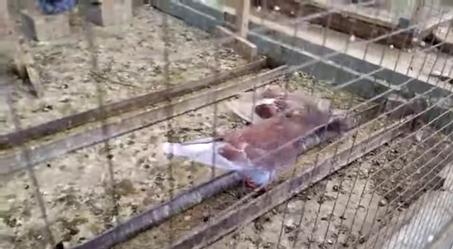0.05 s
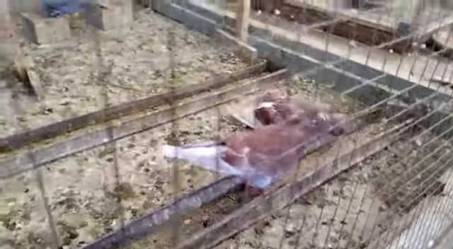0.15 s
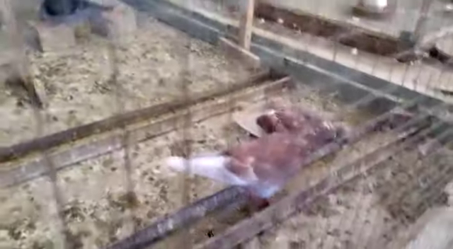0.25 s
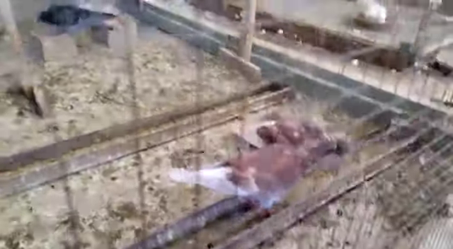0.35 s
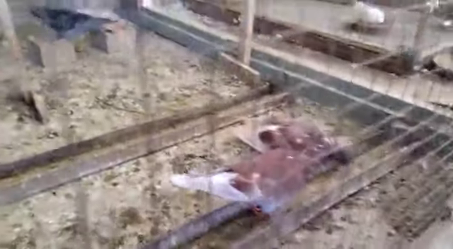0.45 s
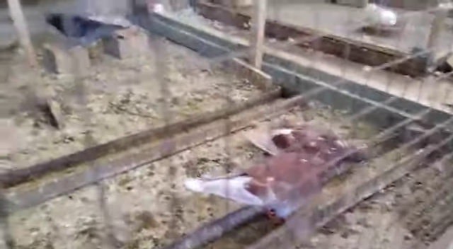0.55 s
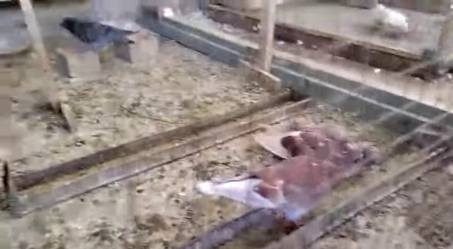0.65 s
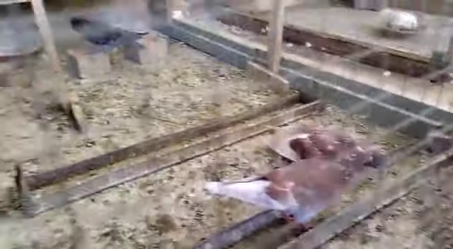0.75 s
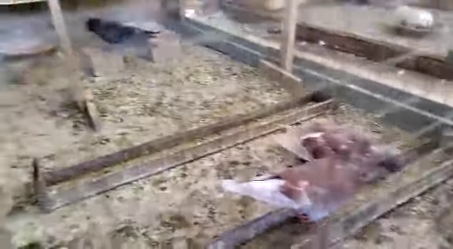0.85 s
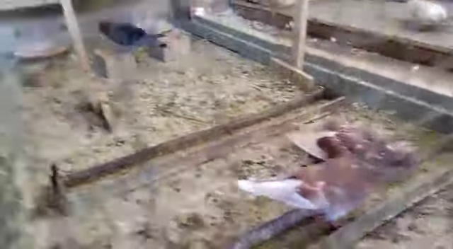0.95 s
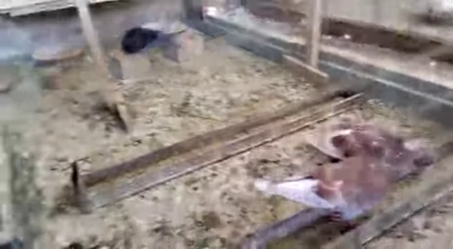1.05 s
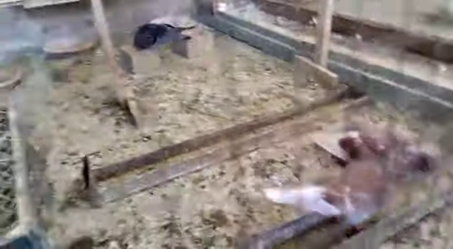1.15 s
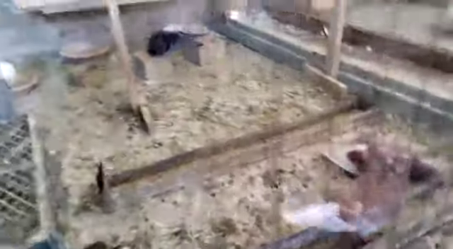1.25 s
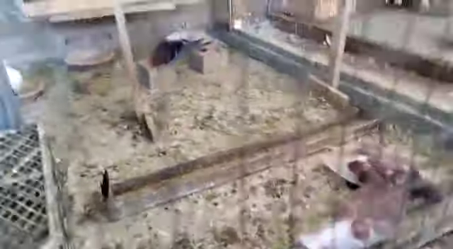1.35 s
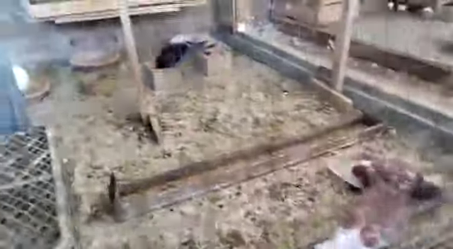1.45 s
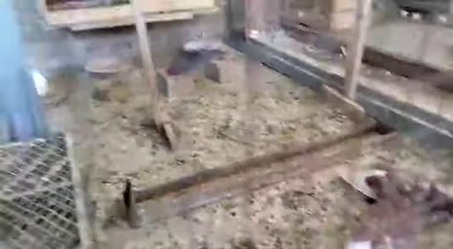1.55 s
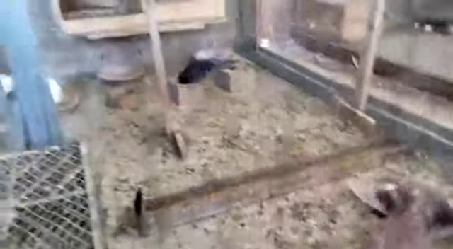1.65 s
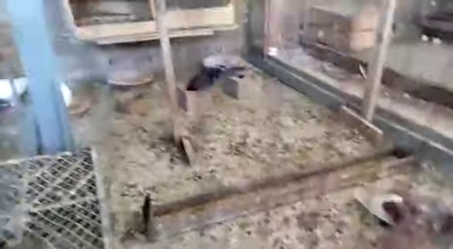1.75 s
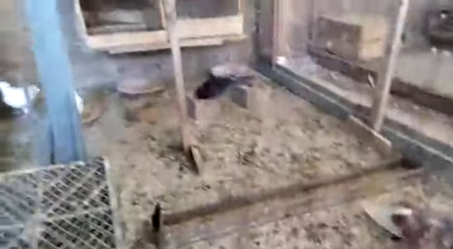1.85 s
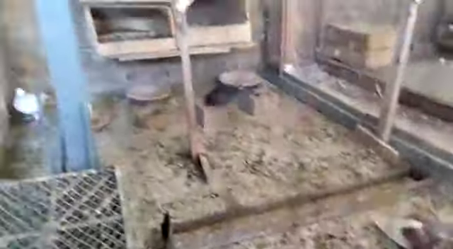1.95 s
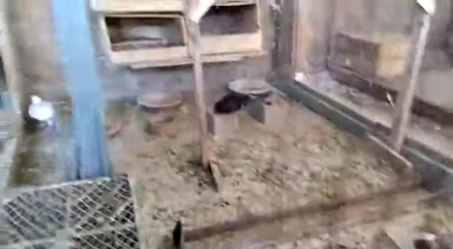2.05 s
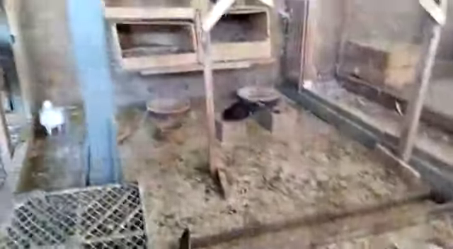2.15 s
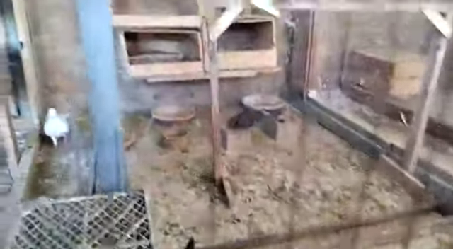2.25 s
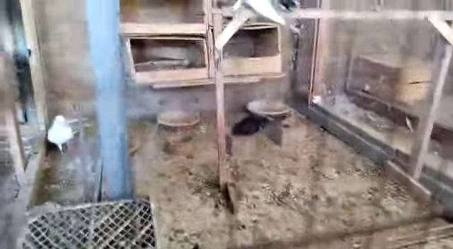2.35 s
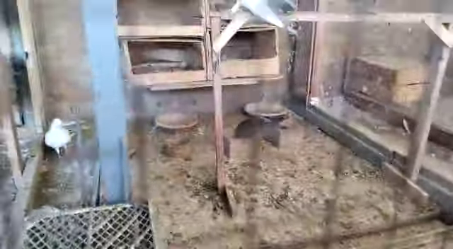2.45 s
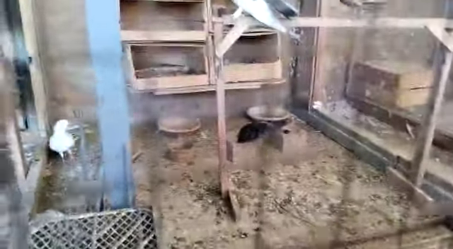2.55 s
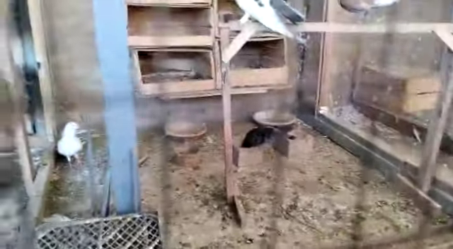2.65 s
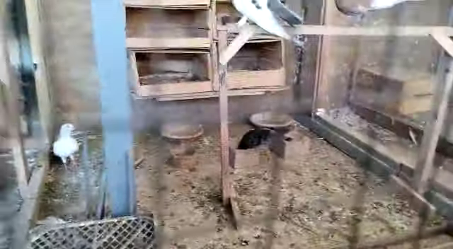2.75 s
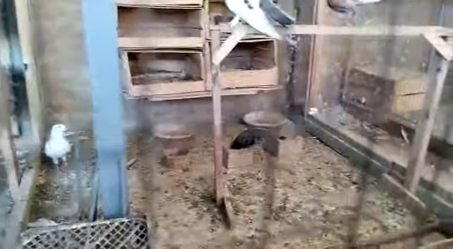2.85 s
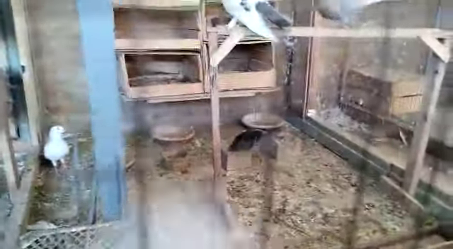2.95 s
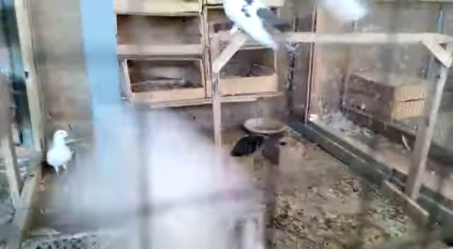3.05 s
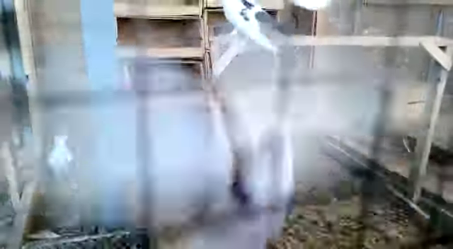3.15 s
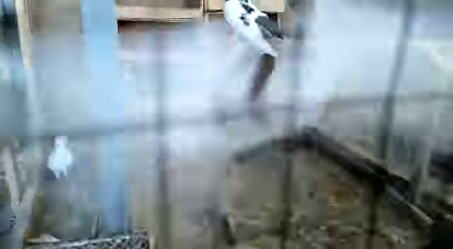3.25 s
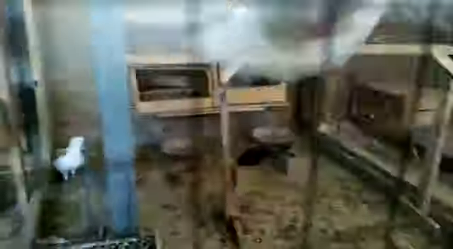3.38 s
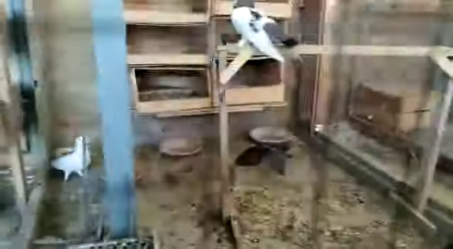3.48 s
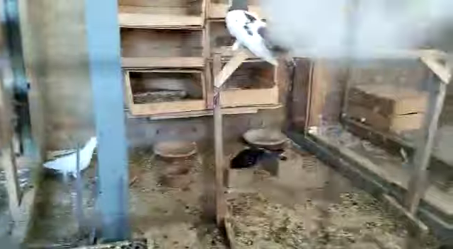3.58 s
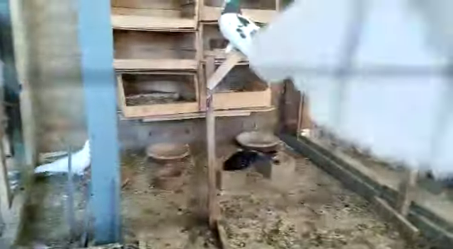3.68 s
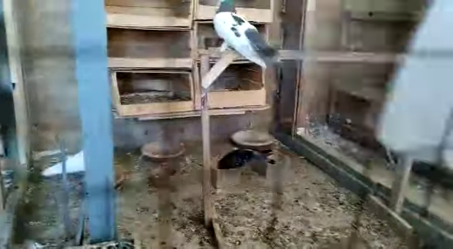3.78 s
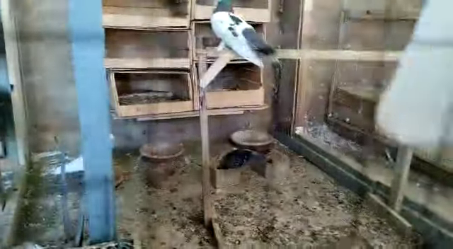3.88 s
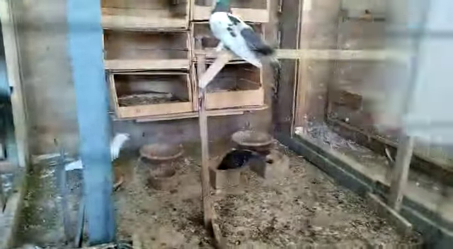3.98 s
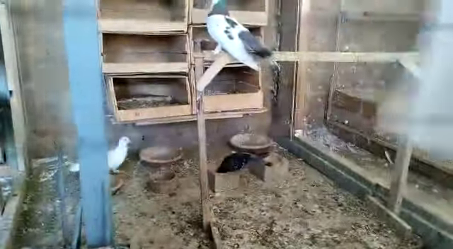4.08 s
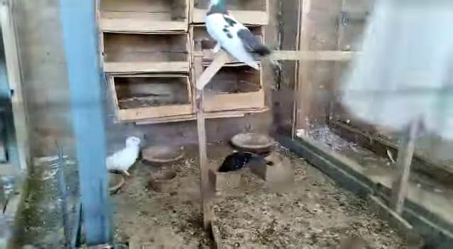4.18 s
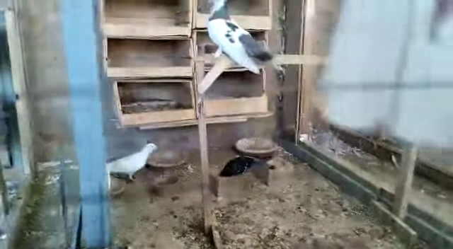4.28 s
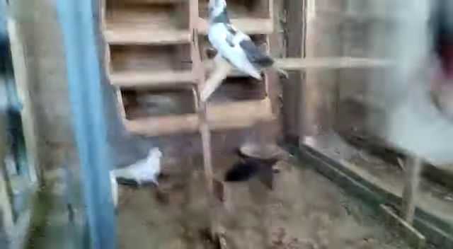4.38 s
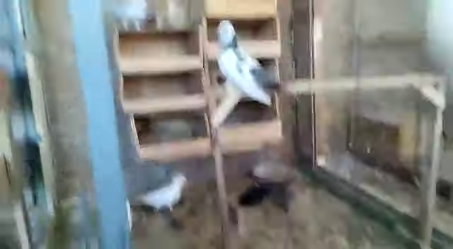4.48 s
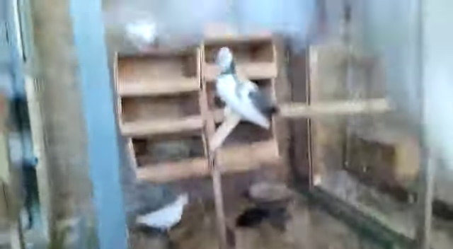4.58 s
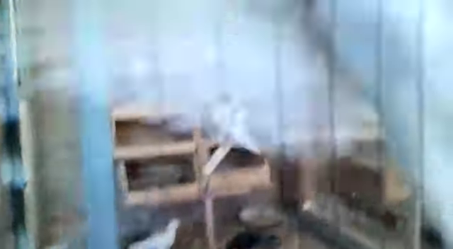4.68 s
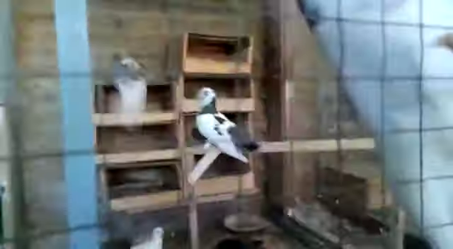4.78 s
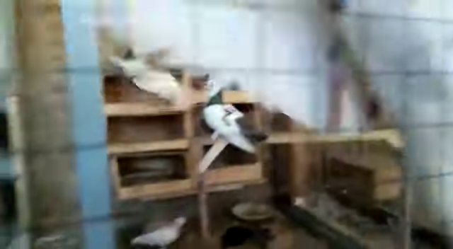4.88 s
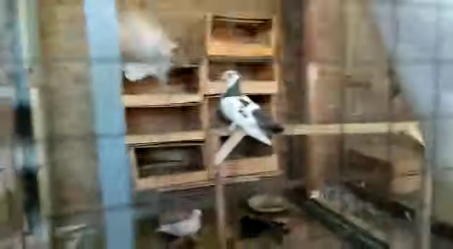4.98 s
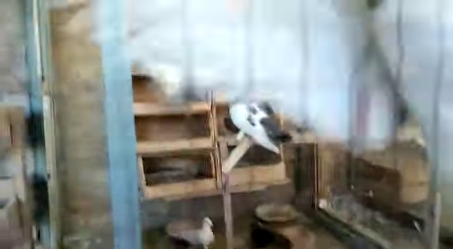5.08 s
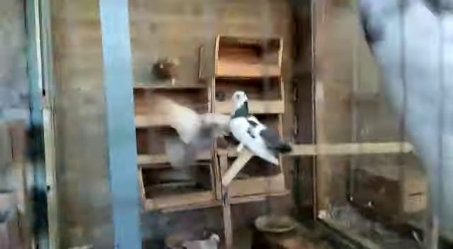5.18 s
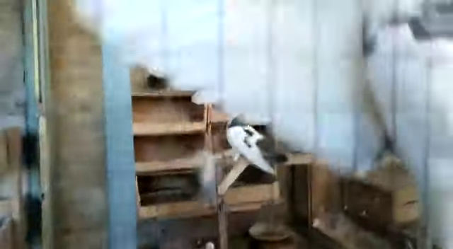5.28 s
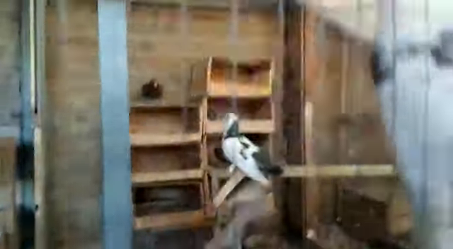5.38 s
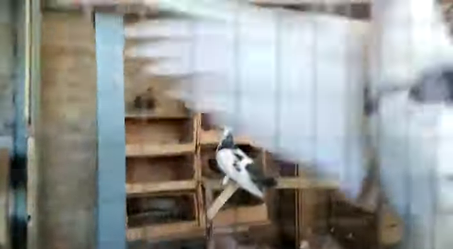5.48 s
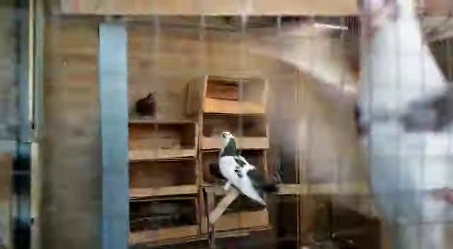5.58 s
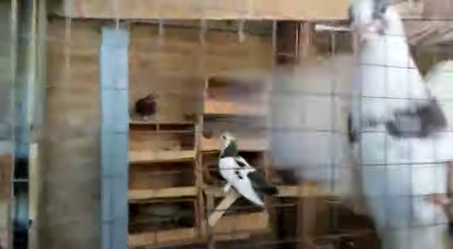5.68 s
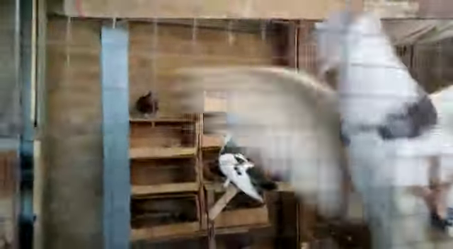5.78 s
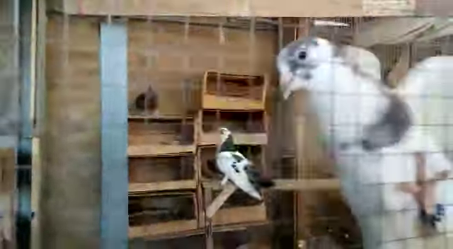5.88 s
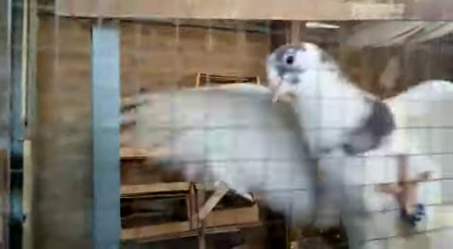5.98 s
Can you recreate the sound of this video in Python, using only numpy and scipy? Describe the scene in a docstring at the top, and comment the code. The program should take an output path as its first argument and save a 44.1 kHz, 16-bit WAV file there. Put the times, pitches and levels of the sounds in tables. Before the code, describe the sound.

In a small wooden pigeon loft, claws tick and beaks knock lightly over faint low rumble and hum, with thin whistles barely heard. Halfway through, a pigeon flaps up right at the microphone with loud, crisp slaps, swishing air and low puffs. It clings there, shuffling its feathers with scratchy rustles, gives small hoarse grunts, and ends with two hard wing claps and a short boxy echo.

```python
"""A pigeon flies up to a wire right in front of the microphone in a small wooden loft: its wings slap as volleys
of tiny clicks, swish as filtered noise and push puffs of air at the microphone, which first bumps softly as it is
handled. It clings there shuffling its feathers, grunts hoarsely, then claps its wings twice; the boards give a
short, bright echo of dense noise. Around it feet and beaks tick and knock as short noise bursts and board rings.
Gliding tones make thin faint whistles and blurred, breathy swishes over a low wavering hum and outdoor rumble."""
import sys
import numpy as np
from scipy import signal
from scipy.fft import rfft, irfft
from scipy.io import wavfile
from scipy.ndimage import uniform_filter1d

SR = 44100
rng = np.random.default_rng(int(sys.argv[2]) if len(sys.argv) > 2 else 0)


def waveform_to_disk(signal):
    """Save audio, clipped to [-1, 1], as 16-bit WAV at the path in sys.argv[1]."""
    frames = np.transpose(np.atleast_2d(signal))
    scaled = np.clip(frames, -1, 1) * 32767
    samples = np.round(scaled).astype(np.int16)
    wavfile.write(sys.argv[1], SR, samples)


N = 265923
TIME = np.arange(N) / SR

# relative noise spectrum of feathers and of stirred litter: f/Hz, level/dB
FEATHER_COLOUR = [(150, -25), (600, -14), (1200, -13), (2300, -10.5), (3400, -9), (4400, -12.5),
                  (5500, -3.5), (7500, 0.5), (9800, -4.5), (12000, -14), (16000, -24)]


def slaps(release_s=0.00047, release_share=1.0, snap_db=-10, thud_db=-25, thud_hz=320, scatter_db=-1.5):
    """The quills hit in a quick volley for as long as the contact lasts; returns direct sound and room send."""
    # wing slaps: t/s, level/dB, contact/s, treble tilt/dB per octave, room send/dB
    slap_hits = [(1.7233, -29, 0.008, 4.5, -14), (1.743, -38, 0.01, -2.5, -11),
                 (3.149, -14, 0.0028, 3, -15), (3.2594, -11.5, 0.0049, -1.5, -10),
                 (3.3169, -10.5, 0.0005, 4.5, -9), (3.376, -14, 0.0032, -1, -11.5),
                 (3.429, -16.5, 0.0028, 4.5, -15), (3.492, -21.5, 0.0029, -1, -4.5),
                 (3.5381, -12, 0.001, 3, -22), (3.547, -18.5, .0022, 2, -25),
                 (3.6697, -20, 0.0068, 3.5, -19), (3.6798, -9, 0.00055, 9, -13),
                 (5.5222, -10, 0.0052, -0.06, -7), (5.645, -7, 0.0034, 0.46, -8)]
    # relative noise spectrum of a slap: f/Hz, level/dB
    slap_colour = [(100, -7), (400, -18.5), (1000, -11), (1600, -9.5), (2600, -4.5), (3500, -5.5),
                   (4400, -8), (5500, 0), (7800, 3.5), (10000, -1.5), (12000, -10), (16000, -17)]
    direct, send = np.zeros(N), np.zeros(N)
    t = TIME[:SR // 10]
    scatter = np.exp(-t / 0.014)
    for s, db, contact_s, tilt_db, room_db in slap_hits:
        decay_s = release_s + release_share * contact_s
        envelope = np.exp(-np.maximum(t - contact_s, 0) / decay_s)
        volley = colour(envelope * crackle(len(t), spread_db=4.0), slap_colour, tilt_db)
        # air squeezed from under the wing
        squeezed_air = unit(band(rng.standard_normal(len(t)), thud_hz, 410))
        thud = amp(thud_db) * envelope * squeezed_air
        # stiff tips snap right up to the top, harder in bright slaps
        snap = amp(snap_db + 2.5 * tilt_db) * envelope * crackle(len(t), spread_db=15)
        add(direct, s, amp(db) * (ringing(volley) + thud + band(snap, 10400, 5300)))
        # each direction gets a different volley, and the nearest boards scatter them all
        spray = ringing(colour(scatter * rng.standard_normal(len(t)), slap_colour, tilt_db))
        match_energy = np.linalg.norm(envelope) / np.linalg.norm(scatter)
        spray = amp(db + room_db) * spray * match_energy
        add(direct, s, amp(scatter_db) * spray)
        add(send, s, spray)
    return direct, send


def ringing(x):
    """A slap together with the wire and board resonances that it sets off."""
    # what the wire and boards ring with under every slap: f/Hz, width/Hz, level/dB
    slap_rings = [(1565, 170, -2), (2210, 560, -6), (3720, 810, -3.5)]
    return x + sum(amp(db) * band(x, hz, width_hz) for hz, width_hz, db in slap_rings)


def flutter(attack_s=0.025, release_s=0.047):
    """Feathers slide over each other and air swishes through them; returns that and the draught on the microphone."""
    # bouts of wing work (take-off, full flight, landing, settling, clinging, two flurries):
    # t/s, length/s, feather hiss level/dB, swish level/dB, draught level/dB
    bouts = [(3.123, 0.11, -35.5, -39.5, -34), (3.237, .28, -31, -37.5, -29),
             (3.527, 0.16, -35.5, -44.5, -34.5), (3.776, 0.048, -29.5, -42, -37),
             (3.892, 1.15, -45, -52.5, -40.5), (5.09, 0.44, -45, -53.5, -47),
             (5.31, 0.15, -40.5, -41, -39.5), (5.524, 0.21, -49, -43, -45)]
    # relative noise spectrum of air through the feathers: f/Hz, level/dB
    swish_colour = [(100, 9.5), (300, 0.5), (500, 3.5), (750, 4), (1100, -3), (2000, -5), (3500, -5),
                    (6000, -24.5)]
    power = np.zeros((3, N))
    for s, length_s, *levels_db in bouts:
        attack = np.clip((TIME - s) / attack_s, 0, 1)
        release = np.exp(-np.maximum(TIME - s - length_s, 0) / release_s)
        power += np.outer(amp(levels_db), attack * release) ** 2
    sliding, airflow, draught = np.sqrt(power)
    unrest = walk(60)
    barbs = crackle(N, spread_db=2.5) * sliding * amp(3.0 * unrest)
    hiss = colour(barbs, FEATHER_COLOUR, tilt_db=-1.0)
    swish = colour(crackle(N, spread_db=5) * airflow * amp(2.9 * unrest), swish_colour)
    eddy_colour = [(12, 6), (35, -15.5), (70, -9.5), (130, -13.5), (300, -35.5), (1000, -120)]
    eddies = unit(colour(rng.standard_normal(N), eddy_colour))
    return hiss + swish, eddies * draught


def puffs(eddy_db=-19, eddy_hz=110):
    """A passing wing pushes air, sucks, and sheds eddies that buffet the microphone; a handling bump has the same shape."""
    # puffs of air from the wing strokes, and first a soft low bump as the microphone is handled:
    # t/s, level/dB, half width/s
    air_puffs = [(.025, -32.5, 0.0067), (3.232, -26.5, 0.018), (3.268, -22.5, .0062),
                 (3.337, -22.5, 0.0076), (3.38, -22, 0.0054), (3.45, -17.5, 0.013), (3.496, -18, 0.0049),
                 (3.544, -14, .011), (3.609, -30, 0.0089), (3.67, -19, .014), (3.828, -29.5, 0.015),
                 (4.157, -32, 0.01), (5.461, -29.5, 0.0055)]
    out = np.zeros(N)
    eddies = unit(band(band(rng.standard_normal(N), eddy_hz, 130), eddy_hz, 290))
    for s, db, width_s in air_puffs:
        u = (TIME - s) / width_s
        pressure = (2 * u ** 2 - 1) * np.exp(-u ** 2)
        buffeting = amp(eddy_db) * eddies * np.exp(-u ** 2 / 4)
        out += amp(db) * (pressure + buffeting)
    return out


def brushes(push_db=-25, push_hz=230, rasp_db=-13.5, rasp_db_per_tilt=2):
    """Feather barbs catch and slip in a jerky stroke that swells and dies away; the shafts rasp on the wire."""
    # feathers brushing wire and wood: t/s, level/dB, length/s, treble tilt/dB per octave
    strokes = [(.0, -44.5, 0.045, -6.5), (0.386, -49.5, 0.084, -2.5), (.818, -45.5, 0.052, -3),
               (1.547, -47.5, .05, 2), (2.087, -50, .06, 6), (2.493, -47, 0.061, -1),
               (2.736, -50.5, 0.069, -1), (3.109, -27.5, 0.086, 1.5), (3.645, -25, 0.024, 12),
               (3.77, -25.5, .022, 3.5), (4.013, -31.5, 0.016, 4), (4.086, -35.5, 0.021, -1),
               (4.141, -32.5, 0.059, 3.5), (4.199, -34, .03, -1.5), (4.25, -30, 0.022, -2),
               (4.389, -25.5, 0.019, 1), (4.435, -28.5, 0.11, 1.5), (4.451, -18.5, 0.0087, 2.5),
               (4.522, -28, 0.077, 0.5), (4.667, -26, 0.028, 1.5), (4.753, -30.5, 0.026, -2),
               (4.804, -28.5, .018, .5), (4.825, -28, 0.016, -2), (4.918, -25.5, 0.034, 1),
               (4.946, -15.5, 0.034, 0), (4.982, -21.5, 0.023, 3), (5.172, -28, 0.022, -1.5),
               (5.398, -32, 0.035, -4.5), (5.86, -39.5, 0.024, 3)]
    out, t = np.zeros(N), TIME[:SR // 4]
    for s, db, length_s, tilt_db in strokes:
        rise_s = 0.22 * length_s  # part of a stroke spent swelling
        envelope = np.minimum(t / rise_s, 1) * np.exp(-np.maximum(t - rise_s, 0) / (length_s - rise_s))
        barbs = crackle(len(t), spread_db=4) * amp(1.5 * walk(250)[:len(t)])
        stroke = colour(envelope * barbs, FEATHER_COLOUR, tilt_db)
        # the duller the stroke, the more the shafts rasp
        rasp = amp(rasp_db - rasp_db_per_tilt * tilt_db) * band(stroke, 3070, 1600)
        moved_air = unit(band(band(rng.standard_normal(len(t)), push_hz, 150), push_hz, 300))
        push = amp(push_db) * envelope * moved_air  # air under the wing
        add(out, s, amp(db) * (stroke + rasp + push))
    return out


def grunts():
    """Hoarse little notes of the straining pigeon: gliding tones with a weak octave and an unsteady pitch."""
    # short, soft grunts: t/s, length/s, start f/Hz, end f/Hz, level/dB
    grunt_notes = [(3.165, 0.048, 705, 835, -34), (5.203, 0.05, 734, 585, -41),
                   (5.321, 0.027, 787, 810, -37.5), (5.388, 0.041, 824, 700, -46)]
    out = np.zeros(N)
    for s, length_s, start_hz, end_hz, db in grunt_notes:
        add(out, s, amp(db) * note(length_s, start_hz, end_hz, flutter_hz=60, overtone=0.33))
    return out


def feet(scratch_s=0.0028, steps_per_s=18, step_db=-65, step_range_db=11, stir_db=-4):
    """Claws tick, beaks and feet knock; the rest of the flock patters and stirs the litter."""
    # claw ticks on wire and perches: t/s, level/dB ahead of the claw and board gains
    ticks = [(0.0315, -31.5), (0.4077, -27), (0.815, -31), (1.064, -38.5), (1.3114, -37.5), (1.6768, -35.5),
             (1.8574, -31.5), (1.933, -32.5), (2.2169, -34.5), (2.358, -36.5), (2.4966, -29), (2.579, -31),
             (2.7359, -30), (2.8907, -30.5), (3.009, -33)]
    # relative noise spectrum of a claw: f/Hz, level/dB
    claw_colour = [(300, -34), (1500, -16.5), (3200, 1), (4400, -8), (6000, 4.5), (8500, 4.5), (12000, -6),
                   (16000, -10)]
    # single pecks and, at the low pitches, footsteps on the boards: t/s, peak level/dB, pitch of the spot f/Hz
    knocks = [(.412, -41, 2000), (.832, -40, 1420), (1.062, -49, 1410), (1.567, -43.5, 730),
              (1.966, -50, 641), (2.191, -43, 1100), (2.314, -45, 684), (3.042, -45, 630)]
    # the flock shuffling in the litter: t/s, level/dB ahead of stir_db
    shuffle = [(0.0, -50), (0.23, -58.5), (0.73, -59), (0.85, -62.5), (1.33, -61), (1.76, -53.5),
               (1.86, -65.5), (2.07, -57.5), (2.63, -57.5), (2.81, -64), (3.0, -59), (3.08, -51)]
    claw_db, under_db = -5, -8  # the claw's own click and the boards under it
    out, t = np.zeros(N), TIME[:SR // 25]
    for s, db in ticks:
        tap = amp(db) * crackle(len(t), spread_db=-3.0) * np.exp(-t / scratch_s)
        click = amp(claw_db) * colour(tap, claw_colour)
        under = amp(under_db) * boards(tap, 2 ** rng.uniform(-0.1, 0.15))
        add(out, s, click + under)
    for s, db, hz in knocks:
        add(out, s, amp(db) * board_knock(hz))
    # one bird feeds in a quick, uneven run of pecks
    feed_start_s, feed_gap_s, feed_db, feed_hz, feed_count = 0.14, 0.056, -46.5, 1470, 12
    for k, (late, force, spot) in enumerate(rng.uniform(-0.89, 1, (feed_count, 3))):
        s = feed_start_s + (k + 0.3 * late) * feed_gap_s
        add(out, s, amp(feed_db + 5.8 * force) * board_knock(feed_hz * 1.6 ** spot))
    # steps of the flock, at random times
    for when, size, spot in rng.random((int(steps_per_s * N / SR), 3)):
        step = amp(step_db + step_range_db * size) * board_knock(600 * 4 ** spot)
        add(out, when * N / SR, step)
    litter_db = np.interp(TIME, *np.transpose(shuffle)) + stir_db + 2.9 * walk(34.9)
    litter = colour(crackle(N, spread_db=14.5) * amp(litter_db), FEATHER_COLOUR, tilt_db=0.8)
    return out + litter


def board_knock(hz, cycles=6, width_hz=520):
    """A beak or foot knocks the boards; each spot has its own dull pitch, and the low ones ring longer; peak 1."""
    t = TIME[:SR // 20]
    tap = rng.standard_normal(len(t)) * np.exp(-t * hz / cycles)
    knock = band(tap, hz, width_hz) + amp(-11) * boards(tap, 1.0)
    dull = signal.butter(3, [350, 2600], "band", fs=SR, output="sos")
    knock = signal.sosfilt(dull, knock)
    return knock / np.abs(knock).max()


def boards(x, pitch):
    """The dull ring of the floor, three resonances shifted together by the pitch factor of the spot."""
    # floor board resonances: f/Hz at pitch 1, width/Hz, level/dB
    board_rings = [(694, 330, 4.5), (1390, 170, -9), (2180, 800, -3.5)]
    return sum(amp(db) * band(x, hz * pitch, width_hz) for hz, width_hz, db in board_rings)


def whistles():
    """Faint gliding tones, some fluttering so widely that they blur into soft noise."""
    # thin faint whistles, and soft, blurred, breathy swishes:
    # t/s, length/s, start f/Hz, end f/Hz, level/dB, pitch flutter/Hz
    faint_notes = [(.64, .28, 5370, 5500, -61, 450), (1.09, .25, 4510, 3900, -58.5, 750),
                   (2.385, 0.12, 5740, 4970, -55, 604), (2.6, 0.067, 3180, 3130, -55, 70),
                   (2.842, 0.029, 3530, 3490, -57, 60), (2.91, 0.035, 6480, 5840, -47.5, 280),
                   (3.055, 0.072, 3260, 3240, -54, 70)]
    out = np.zeros(N)
    for s, length_s, start_hz, end_hz, db, flutter_hz in faint_notes:
        add(out, s, amp(db) * note(length_s, start_hz, end_hz, flutter_hz))
    return out


def note(length_s, start_hz, end_hz, flutter_hz, overtone=0):
    """A gliding note that swells and fades, with an unsteady pitch."""
    n = int(length_s * SR)
    pitch_hz = np.linspace(start_hz, end_hz, n) + flutter_hz * walk(700)[:n]
    phase = 2 * np.pi * np.cumsum(pitch_hz) / SR
    return np.hanning(n) * (np.sin(phase) + overtone * np.sin(2 * phase))


def loft(x):
    """The birds keep moving, so each moment meets its own pattern of echoes, crossfaded in 0.1 s hops."""
    out, hop = np.zeros(N), SR // 10
    x = np.pad(x, (0, 2 * hop))
    fade = np.sin(np.pi * np.arange(2 * hop) / (2 * hop))
    for i in range(0, N, hop):
        add(out, i / SR, signal.fftconvolve(x[i:i + 2 * hop] * fade, echoes()))
    return out


def echoes(split_hz=10000, t60_s=0.25, treble_t60_s=0.12):
    """Dense reflections from close boards for one place of the bird; the top dies first."""
    t = TIME[:SR // 3]
    noise = crackle(len(t), spread_db=3) * (1 - np.exp(-t / 0.004))
    low = signal.sosfilt(signal.butter(4, split_hz, "low", fs=SR, output="sos"), noise)
    high = signal.sosfilt(signal.butter(4, split_hz, "high", fs=SR, output="sos"), noise)
    low_tail = low * np.exp(-np.log(1000) * t / t60_s)
    high_tail = amp(3.0) * high * np.exp(-np.log(1000) * t / treble_t60_s)
    response = low_tail + high_tail
    return response / np.linalg.norm(response)


def background(hum_hz=128.4):
    """Low outdoor rumble of filtered noise, and a hum of wavering pitch and level that sinks until 2.8 s."""
    # relative noise spectrum of the outdoor air: f/Hz, level/dB
    air_colour = [(20, 1.5), (45, -7), (70, 2.5), (120, -2.5), (170, -4.5), (250, -8.5), (400, -17),
                  (800, -23), (2000, -32.5), (4400, -30), (7500, -25.5), (12000, -38), (16000, -40)]
    swell_db, waver_db = 0.6 * walk(6), 1.6 * walk(9)
    air = unit(colour(rng.standard_normal(N), air_colour)) * amp(-49 + swell_db)
    phase = 2 * np.pi * np.cumsum(hum_hz * (1 + 0.01835 * walk(15))) / SR
    hum_db = np.interp(TIME, [0, 2.2, 2.8, 6], [-48, -52.5, -55.0, -54])
    return air + amp(hum_db + waver_db) * np.sin(phase)


def amp(db):
    """Decibels to gain."""
    return 10 ** (np.asarray(db) / 20)


def unit(x):
    """Scale to rms 1."""
    return x / np.sqrt(np.mean(x ** 2) + 1e-18)


def add(out, s, x):
    """Mix x into out from time s on."""
    i = max(int(s * SR), 0)
    out[i:i + len(x)] += x[:max(N - i, 0)]


def colour(x, points, tilt_db=0, size=4096):
    """Causal, power-keeping filter through (f/Hz, level/dB) points, tilted per octave up to 8 kHz."""
    hz, db = np.transpose(points)
    octave = np.log2(np.maximum(np.fft.rfftfreq(size, 1 / SR), 1))
    tilt = tilt_db * np.clip(octave, np.log2(hz[0]), np.log2(8000))
    gain_db = np.interp(octave, np.log2(hz), db) + tilt
    # folding the cepstrum gives minimum phase: the response starts at once
    cepstrum = irfft(np.log(amp(gain_db)))
    folded = np.r_[cepstrum[0], 2 * cepstrum[1:size // 2]]
    response = irfft(np.exp(rfft(folded, size)))
    return signal.fftconvolve(x, response / np.linalg.norm(response))[:len(x)]


def band(x, hz, width_hz):
    """One resonance, gain 1 at its centre."""
    return signal.lfilter(*signal.iirpeak(hz, hz / width_hz, fs=SR), x)


def walk(rate):
    """Smooth chance of rms 1, with a new random value rate times a second."""
    k = max(int(SR / rate), 1)
    steps = np.repeat(rng.standard_normal(N // k + 1), k)
    return unit(uniform_filter1d(steps, k)[:N])


def crackle(n, spread_db):
    """Dense tiny clicks of rms 1; the wider their sizes spread, the grainier the sound."""
    sizes = amp(spread_db * np.minimum(rng.standard_normal(n), 3))
    return unit(rng.standard_normal(n) * sizes)


def scene():
    """Near wings are mostly direct; floor sounds and faint whistles come with more of the room."""
    slap, slap_send = slaps()
    rustle, draught = flutter()
    pigeon = brushes() + rustle + grunts()
    floor, faint = feet(), whistles()
    room = loft(slap_send + amp(-9.5) * pigeon + amp(-2.5) * floor + amp(-4.0) * faint)
    # air on the microphone and the background have no echo
    return (slap + pigeon + floor + faint + room + draught + puffs() + background())[None]


def record(dry, top_hz=16000):
    """The recorder clips peaks above full scale, and a steep low-pass cuts the top."""
    low_pass = signal.ellip(8, 0.2, 70, top_hz, fs=SR, output="sos")
    return signal.sosfilt(low_pass, np.clip(dry, -1, 1))


dry = scene()
out = record(dry)
waveform_to_disk(out)
```